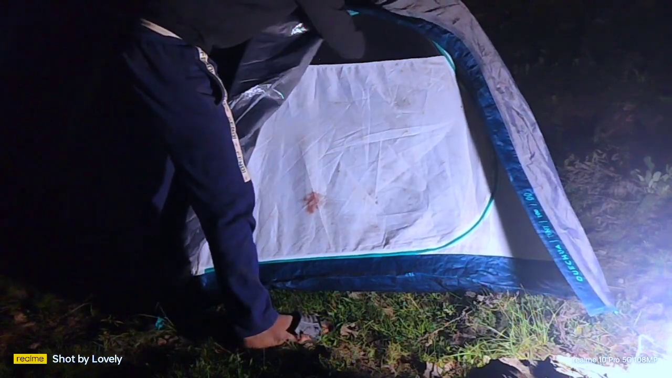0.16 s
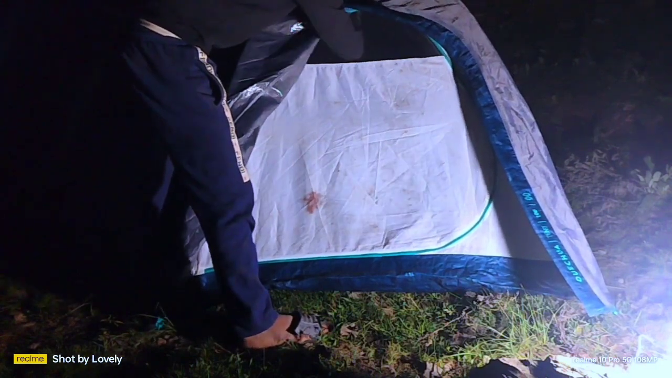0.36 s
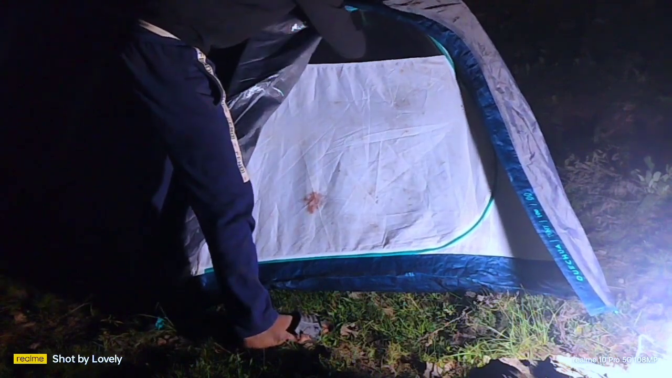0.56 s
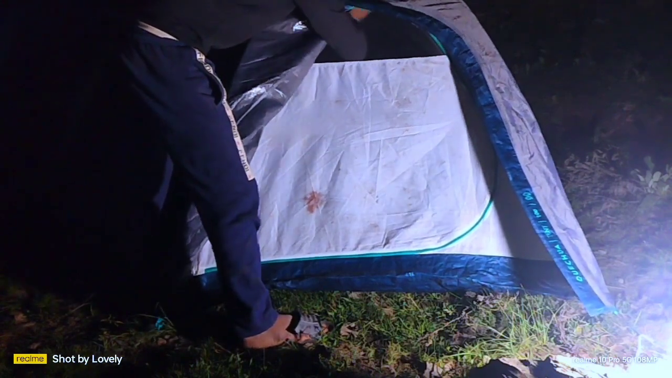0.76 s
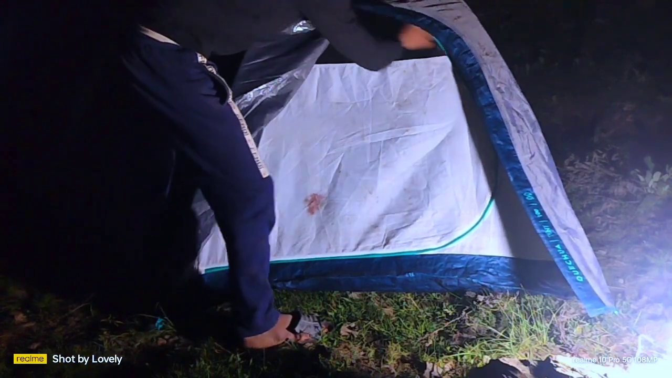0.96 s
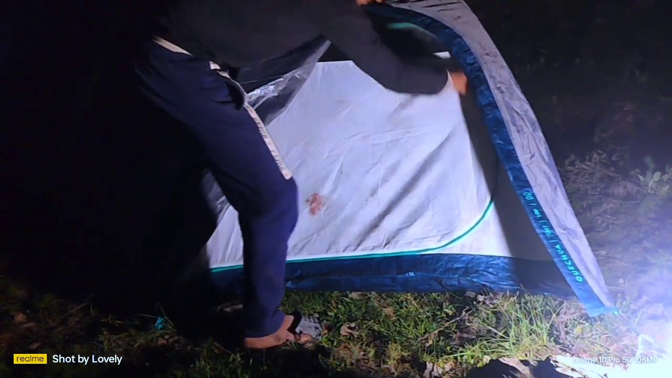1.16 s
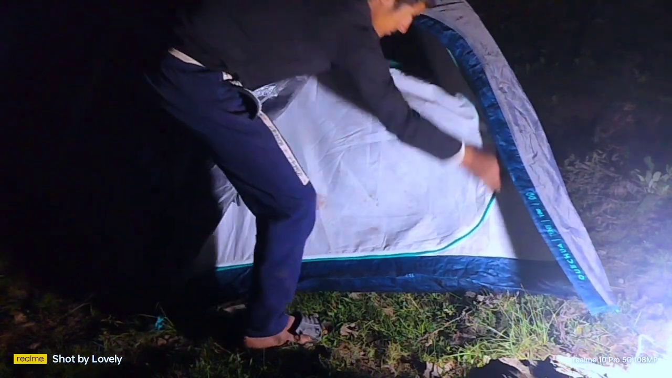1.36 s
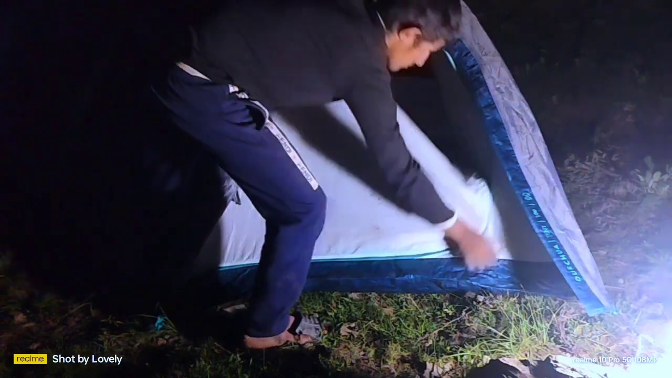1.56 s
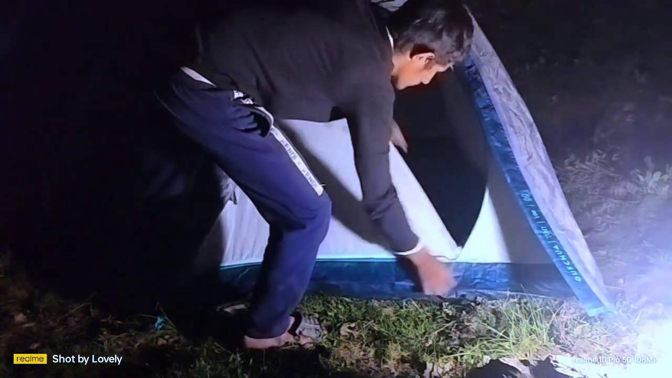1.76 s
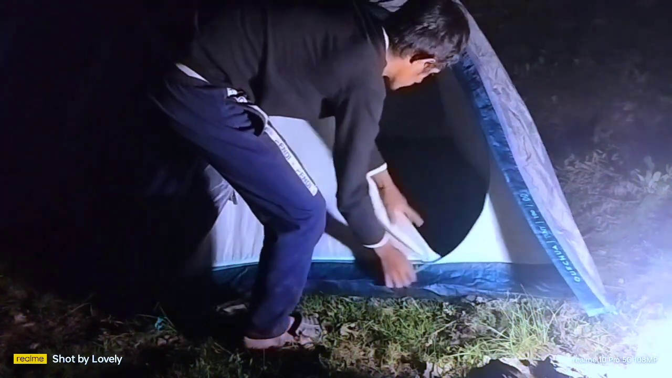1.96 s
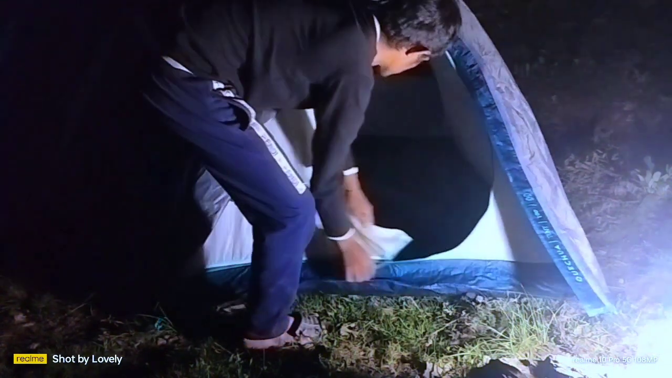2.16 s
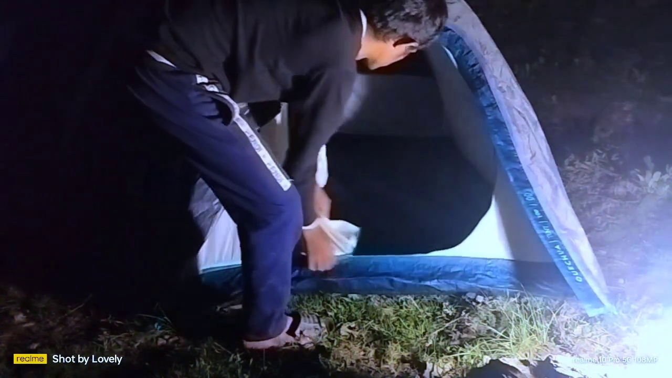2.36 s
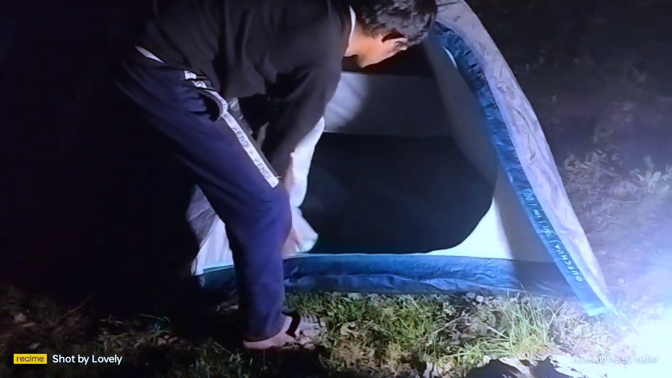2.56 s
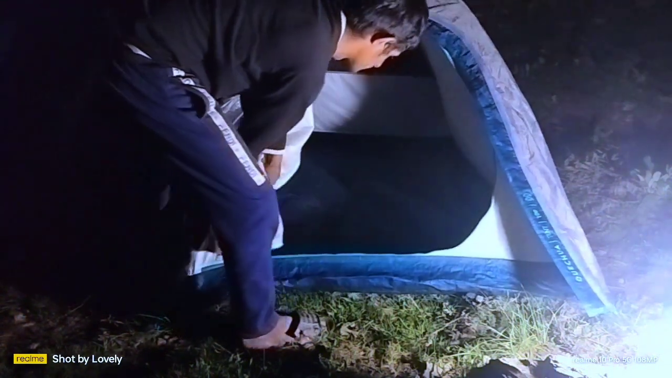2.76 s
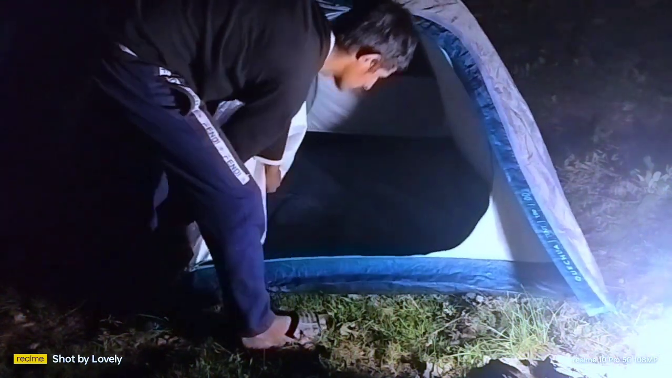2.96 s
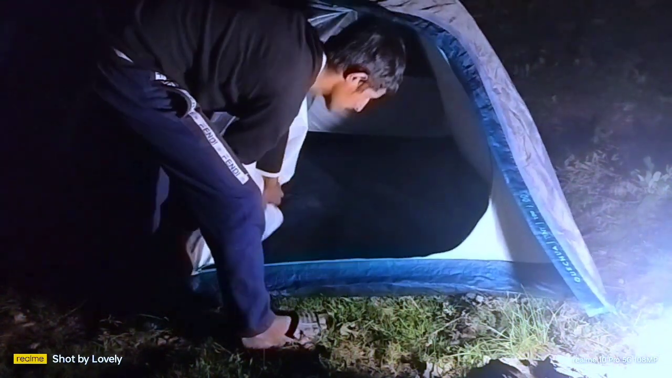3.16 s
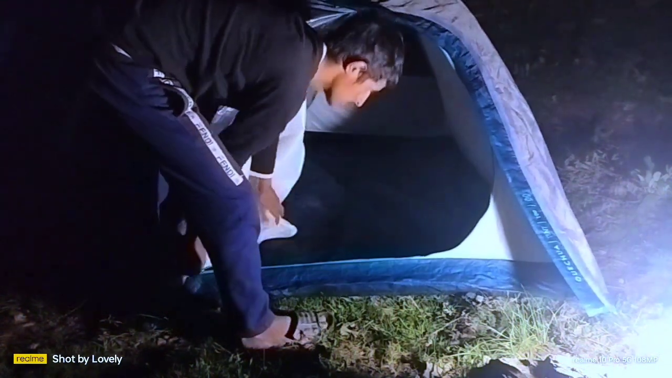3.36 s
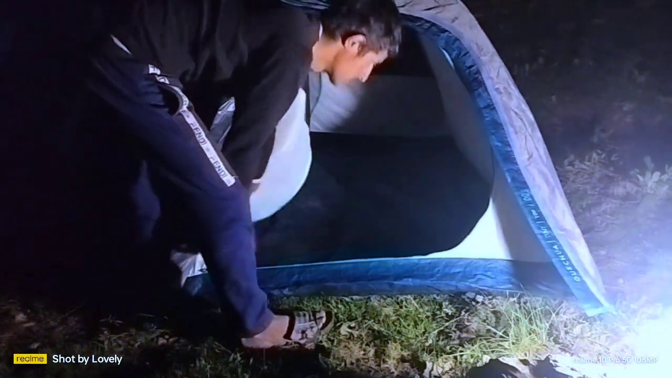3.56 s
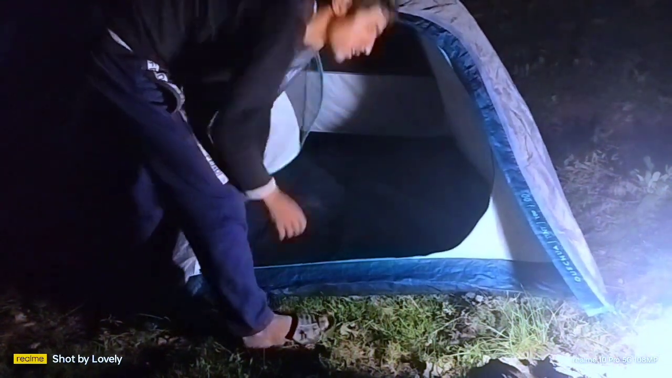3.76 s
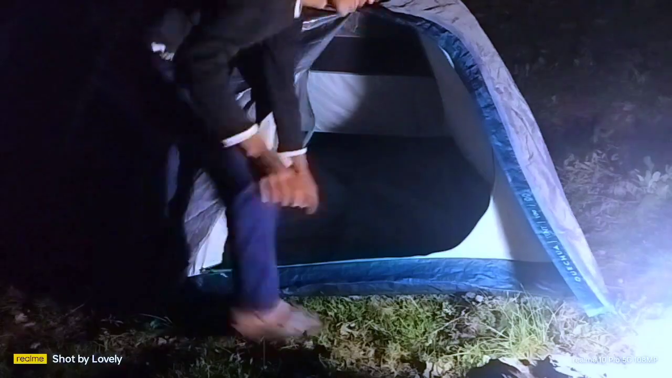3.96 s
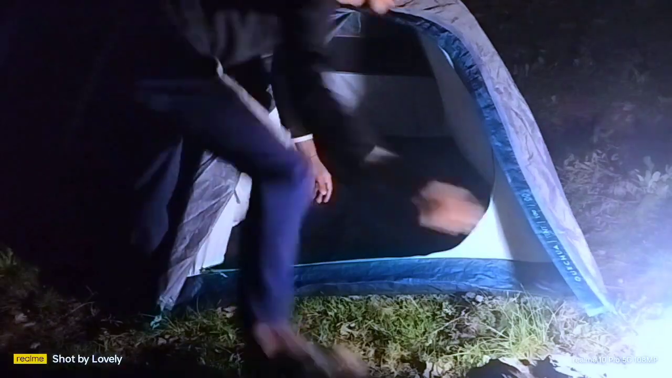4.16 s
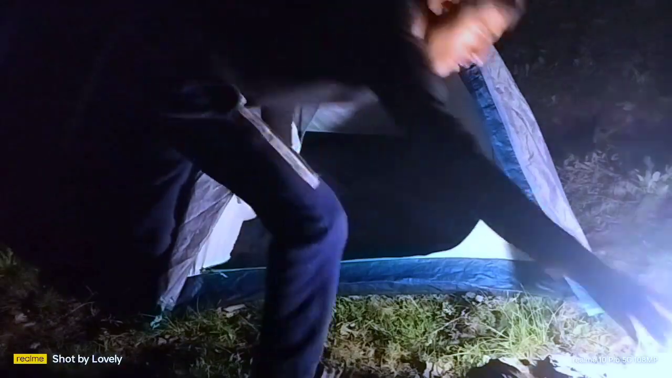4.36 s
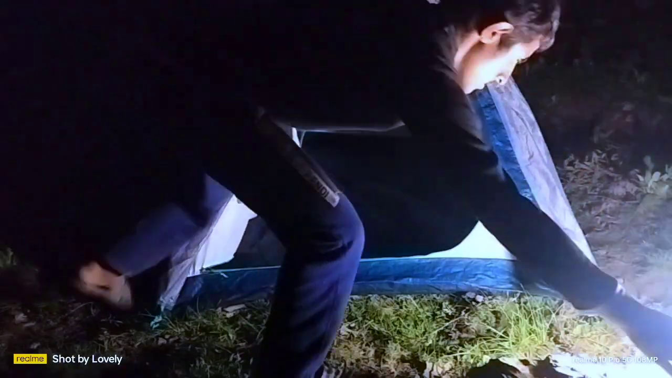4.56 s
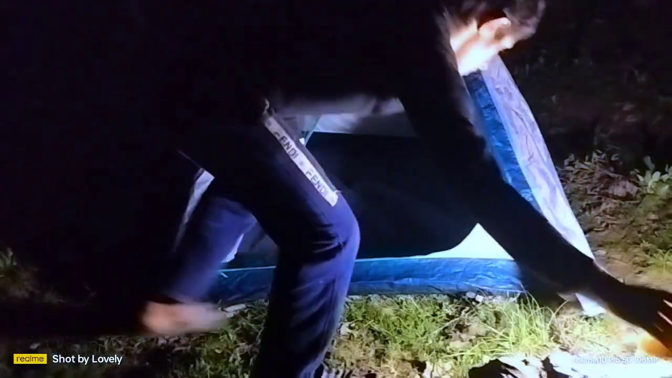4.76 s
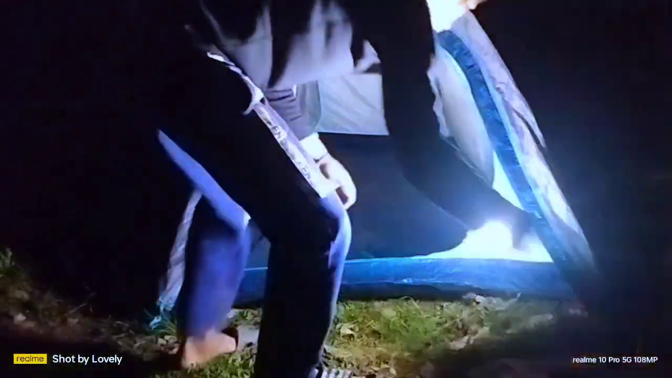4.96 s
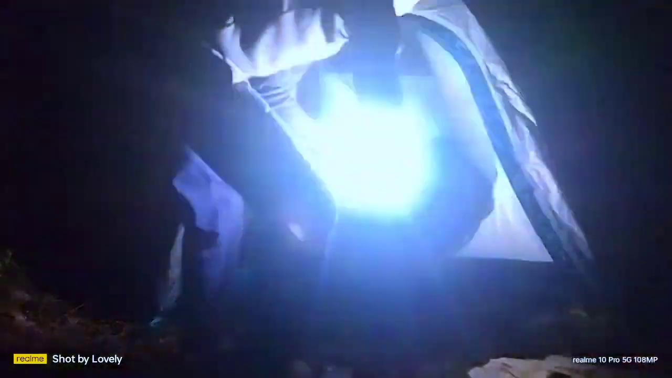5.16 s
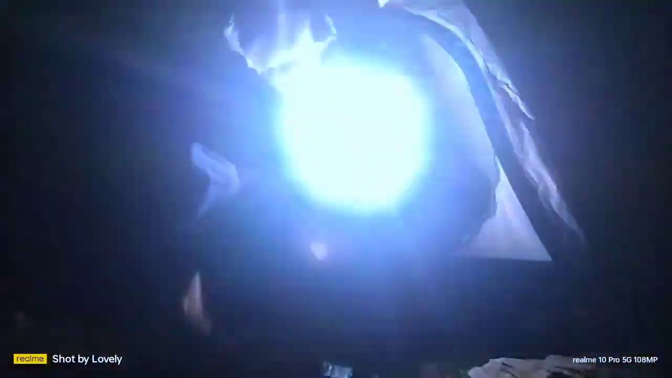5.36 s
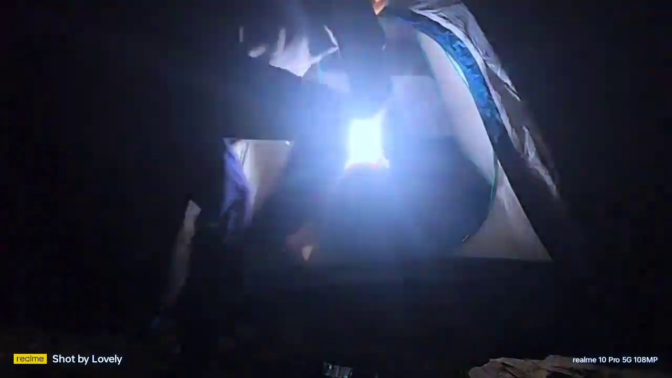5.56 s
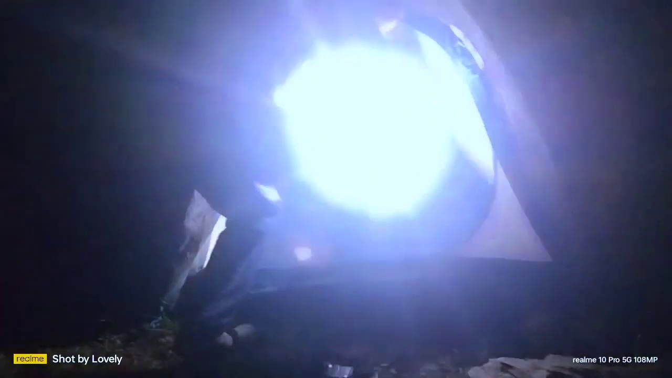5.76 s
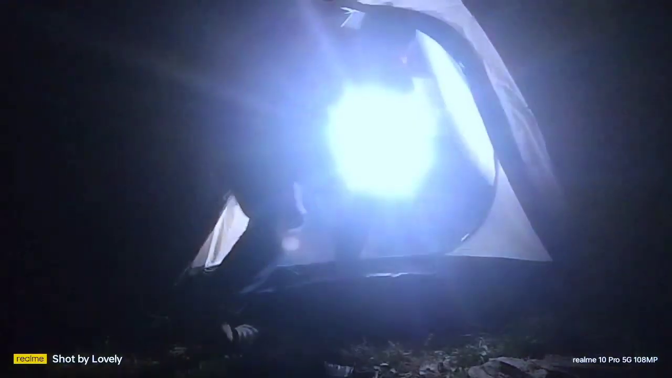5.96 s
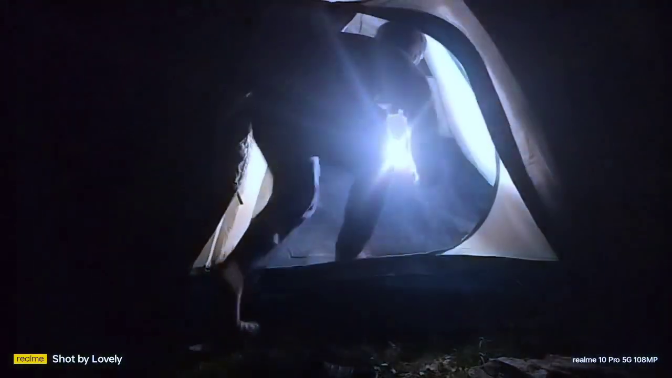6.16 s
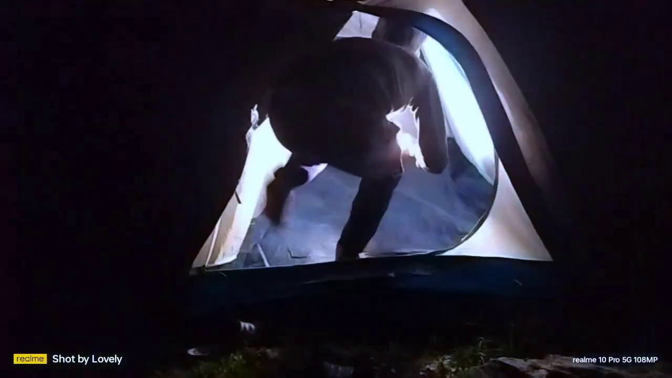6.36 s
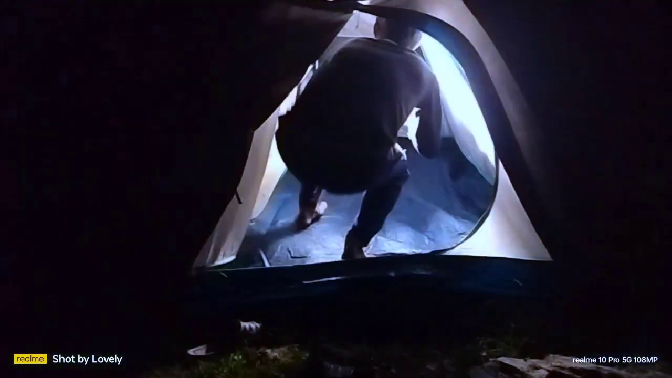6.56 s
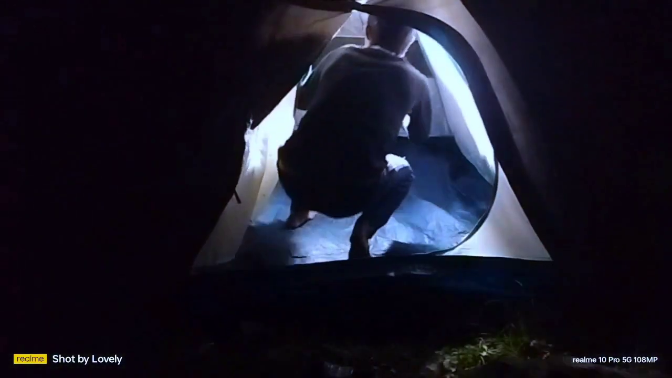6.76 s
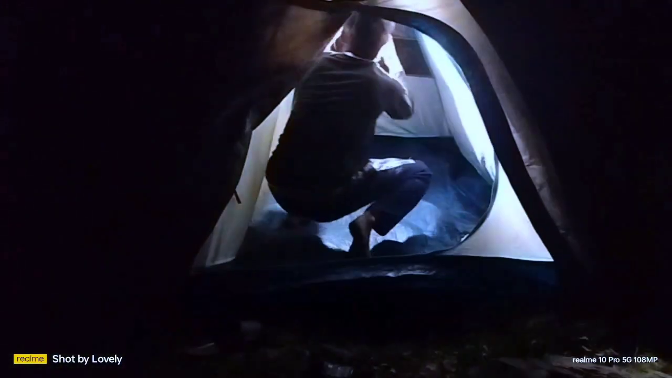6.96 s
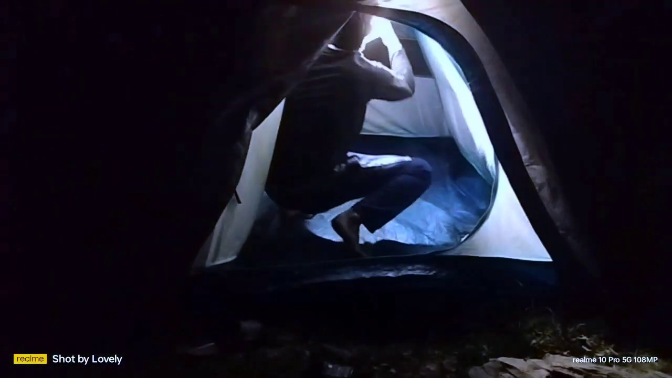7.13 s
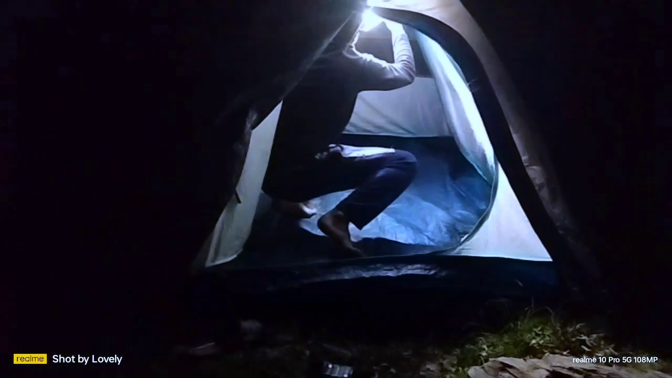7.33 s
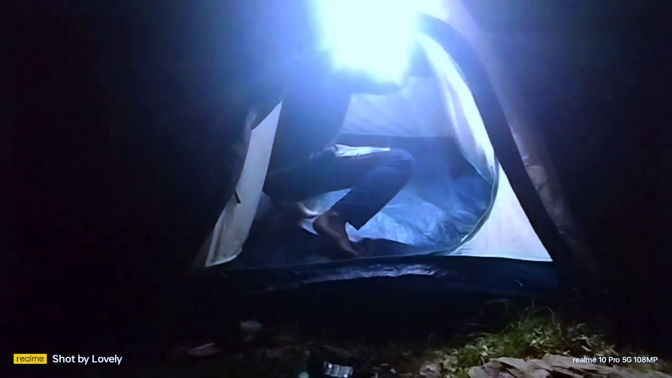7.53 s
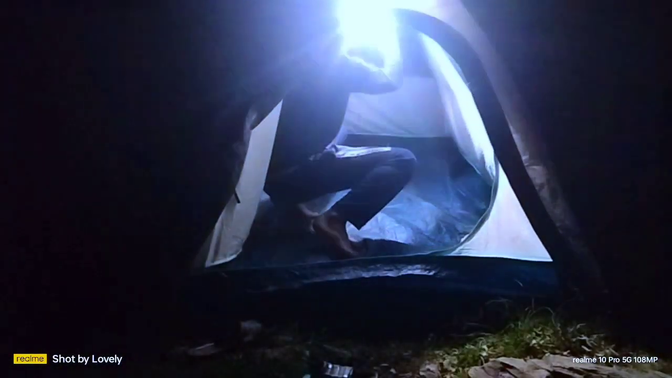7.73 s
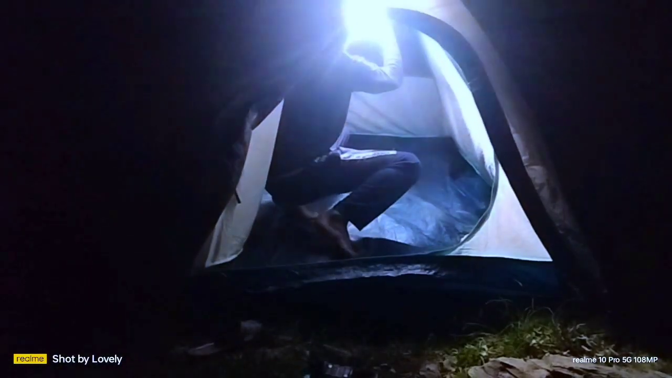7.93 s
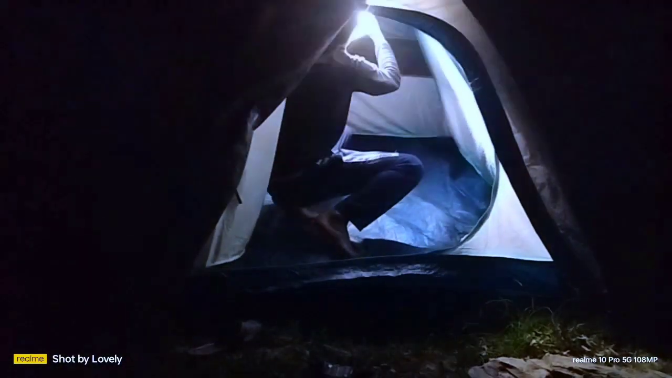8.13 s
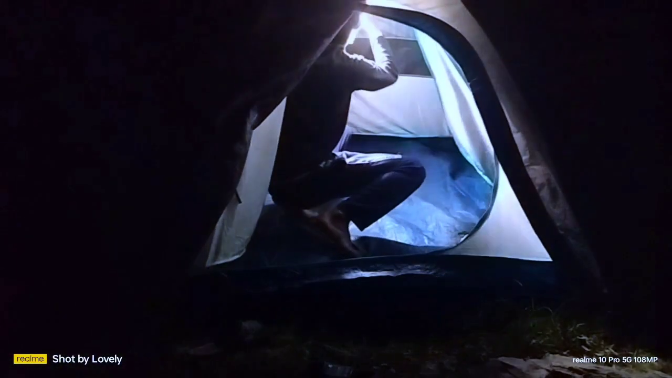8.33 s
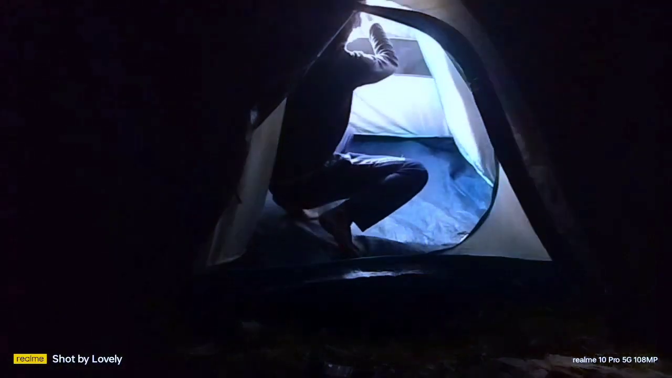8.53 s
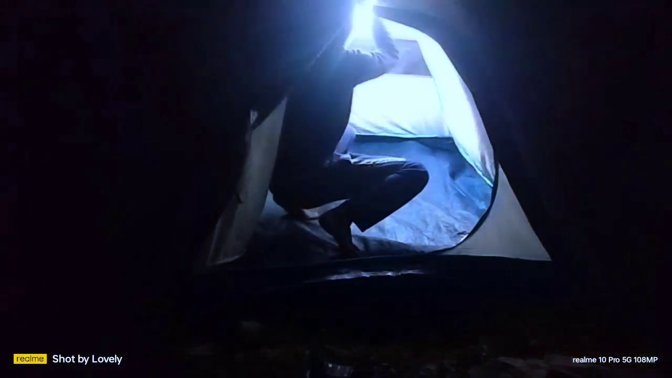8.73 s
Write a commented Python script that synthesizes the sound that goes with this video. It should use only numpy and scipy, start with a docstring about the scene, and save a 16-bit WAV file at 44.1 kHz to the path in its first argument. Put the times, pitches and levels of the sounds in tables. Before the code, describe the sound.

A zipper slider buzzes along a tent door, its pitch rising, sinking into rough, jerky clicks and rising unevenly before stopping. The nylon door is gathered with light rustles and a tiny squeak. A foot thumps and grass brushes; a pause, then loud crackly nylon, knocks and swishes as a person enters and crouches. Last come sparse faint creases. Dry, near, wide stereo microphones, very quiet night air.

```python
"""Tent door unzipped at night

One long curved pull: the slider whines at its tooth rate, a sine with three overtones. Nylon flaps, crumples
and swishes (noise bands under level curves) as the door is folded away and someone crawls in, with pops
(dying noise bursts in resonances), squeaks (narrow noise), thuds and grass brushes.
A faint night hiss lies under all; two spaced microphone ports listen."""
import sys
import numpy as np
from scipy import signal
from scipy.fft import rfft, irfft
from scipy.io import wavfile
from scipy.ndimage import uniform_filter1d, map_coordinates

SR = 44100
rng = np.random.default_rng(int(sys.argv[2]) if len(sys.argv) > 2 else 0)


def pcm_store(signal):
    """Save signal as 16-bit PCM."""
    levels = np.round(np.clip(np.atleast_2d(signal), -1, 1) * 32767)
    wavfile.write(sys.argv[1], SR, levels.astype(np.int16).T)


N = 387624
STEP = 16   # samples per control value


def from_db(db):
    """Amplitude gain of a level in dB."""
    return 10 ** (np.asarray(db) / 20)


def rms_one(x):
    """Scaled to rms 1."""
    return x / np.sqrt(np.mean(x ** 2) + 1e-20)


def in_time(rows):
    """Columns of a timed table, interpolated to one value a sample."""
    s, *columns = np.transpose(rows)
    t = np.arange(N) / SR
    return np.array([np.interp(t, s, column) for column in columns])


def at_hz(points, hz):
    """Spectrum read on a log-frequency axis."""
    points_hz, values = np.array(points).T
    return np.interp(np.log(hz), np.log(points_hz), values)


def drift(rate_hz):
    """Slow random curve of rms 1: noise twice through a one-pole low-pass, held for STEP samples."""
    settle = 2000
    pole = np.exp(-2 * np.pi * rate_hz * STEP / SR)
    noise = rng.standard_normal(N // STEP + 2 + settle)
    slow = signal.lfilter([1], [1, -2 * pole, pole * pole], noise)[settle:]
    return np.repeat(rms_one(slow), STEP)[:N]


def resonance(x, hz, width_hz):
    """Two-pole peak of gain 1."""
    r = np.exp(-np.pi * width_hz / SR)
    numerator = np.array([1, 0, -1]) * (1 - r * r) / 2
    return signal.lfilter(numerator, [1, -2 * r * np.cos(2 * np.pi * hz / SR), r * r], x)


def bands(bass, treble, likeness):
    """Narrow stereo noise bands of power about 1 per Hz, yielded as (centre Hz, sound)."""
    edges_hz = 22 * 2 ** np.arange(0, 9.7, .4)
    for k, (low, high) in enumerate(zip(edges_hz, edges_hz[1:])):
        source = bass if low < 3000 else treble
        band = signal.butter(2, [low, high], "band", fs=SR, output="sos")
        mid, side = signal.sosfilt(band, source[k % 2])   # alternate sources: neighbours unrelated
        hz = np.sqrt(low * high)
        alike = np.clip(at_hz(likeness, hz), -.99, .99)
        stereo = np.sqrt(1 + alike) * mid + np.sqrt(1 - alike) * side * [[1], [-1]]
        yield hz, np.sqrt(SR / 4.4) * stereo


# hiss spectrum: f/Hz, relative level/dB per Hz
NIGHT_SPECTRUM = [(12, -32), (20, -2), (22, -5.5), (77, -1), (222, -4.5), (277, -2), (319, -6.5),
                  (422, -19), (499, -11), (1150, -18), (1480, -18), (2910, -29), (16000, -39.5)]
# hiss stereo: f/Hz, left-right likeness/1
NIGHT_LIKENESS = [(60, 0.14), (380, 0.25), (2380, 0.043), (15000, 0.01)]
NIGHT_RMS_DB = -65


def night():
    """Far, smooth hiss; each band drifts slowly in level."""
    white = rng.standard_normal((2, 2, N))
    out = 0
    for hz, sound in bands(white, white, NIGHT_LIKENESS):
        out = out + from_db(at_hz(NIGHT_SPECTRUM, hz) + 0.39 * drift(3.0)) * sound
    return from_db(NIGHT_RMS_DB) * rms_one(out)


RUSTLE_RANGE_DB = 33.5   # climbed in the rise, lost in the fall
RUSTLE_ROUND = 1.144   # above 1: rounded top


def swell(t, peak_s, rise_s, fall_s):
    """Level in dB re peak of a rounded rise and fall."""
    distance = np.maximum((peak_s - t) / rise_s, (t - peak_s) / fall_s)
    return -RUSTLE_RANGE_DB * distance ** RUSTLE_ROUND


# opening door: t/s, swish level/dB, crumple re swish/dB, flap re what the speed gives/dB
DOOR = [(0.72, -80, 10, -2), (0.75, -65.5, -6, -14), (0.85, -67.5, 11.5, 8.5), (1.0, -45, -8, -3),
        (1.31, -44.5, 1, 5), (1.47, -39.5, -2, 2), (1.75, -40.5, 6.5, 1.1), (1.8, -38.5, 4.5, 1.6),
        (1.82, -28.5, 7, -2.2), (1.83, -36.5, 11, -0.8), (1.95, -41, 3.5, 0.1), (2.0, -36, 13, 2.8),
        (2.01, -42.5, 8, -1.6), (2.11, -38.5, -1, 2.8), (2.14, -33, 3, 2), (2.16, -49.5, 11, 2.5),
        (2.17, -36, 7, 1.3), (2.23, -40.5, 11.5, 8.8), (2.45, -43.5, 13, -0.5), (2.69, -36.5, 2.5, -5.6),
        (2.87, -49.5, 17, 1.1), (3.01, -44.5, 8, 10), (3.15, -83, 11.5, 0.1), (3.18, -69, 7, 13)]
# cloth, grass and clothes: peak t/s, rise/s, fall/s, flap level/dB, crumple level/dB, swish level/dB
RUSTLES = [(.15, 0.41, 0.6, -67.5, -69.5, -73.5), (3.088, 0.15, 0.058, -42.5, -53.5, -72),
           (3.208, 0.13, 0.18, -59, -60.5, -67), (3.298, 0.12, 0.67, -57.5, -67.5, -72.5),
           (3.612, 0.11, 0.42, -50.5, -68, -69.5), (3.801, 0.26, 0.13, -53.5, -61, -70.5),
           (3.914, 0.16, 0.28, -60, -62, -72.5), (4.178, 0.015, 0.075, -88, -80, -66),
           (4.291, 0.038, 0.041, -36, -47, -39.5), (4.371, 0.15, 0.17, -65, -63, -65.5),
           (4.486, 0.098, 0.07, -63, -62, -67.5), (4.97, 0.066, .15, -65.5, -74.5, -69),
           (5.041, 0.16, 0.043, -67, -66, -71), (5.234, 0.084, 0.089, -64, -62, -50),
           (5.285, 0.11, 0.035, -57.5, -75, -58), (5.72, 0.14, 0.38, -68.5, -83.5, -90.5),
           (5.936, 0.031, 0.11, -38, -39.5, -57), (5.978, 0.066, 0.075, -24.5, -27, -45),
           (6.06, 0.078, 0.16, -34, -38.5, -59), (6.11, .1, 0.16, -37, -35, -52),
           (6.164, 0.24, 0.029, -44, -36, -61), (6.238, 0.047, 0.13, -56, -50, -53),
           (6.28, 0.094, 0.047, -62, -67, -56), (6.36, 0.079, 0.071, -51.5, -47.5, -72),
           (6.52, 0.046, 0.24, -45.5, -45.5, -64), (6.61, 0.15, 0.096, -47.5, -49, -63.5),
           (6.728, 0.041, 0.12, -60, -45, -48), (6.78, 0.078, 0.12, -51, -55, -43),
           (6.835, 0.1, 0.12, -44, -29.5, -46), (6.9, .1, 0.25, -60, -64, -77),
           (7.07, .04, 0.18, -67, -57, -64.5), (7.171, 0.11, 0.31, -50, -48, -57.5),
           (7.3, 0.11, 0.31, -60, -54.5, -66), (7.392, 0.11, 0.055, -61, -50.5, -63),
           (8.04, 0.071, 0.097, -64, -67, -78), (8.33, .08, 0.072, -61, -73.5, -81)]
# dry grass: peak t/s, rise/s, fall/s, level/dB
BRUSHES = [(.15, .2, .2, -76), (4.99, 0.13, 0.13, -65), (5.24, 0.041, 0.092, -44.5),
           (6.79, 0.14, 0.15, -42)]
# feet and knees: t/s, billow level/dB
THUDS = [(4.29, -28), (5.27, -51), (5.972, -29), (6.518, -42), (6.835, -51), (7.392, -49)]
THUD_S = 0.028   # for RUSTLE_RANGE_DB, either side
BILLOW_RE_FLAP_DB = -14.5
DOOR_FLAP_DB = 7.5   # re swish at 400 teeth per s
FLAP_DB_PER_OCTAVE = -16.5   # slow slider shakes the cloth, fast one only rasps


def motion():
    """Power of billow, flap, crumple, swish and brush, every STEP samples: door, rustles, brushes, thuds."""
    t = np.arange(0, N, STEP) / SR
    teeth_hz = in_time(np.vstack(PULL))[0, ::STEP]
    swish_db, crumple_db, flap_db = in_time(DOOR)[:, ::STEP]
    flap_db = DOOR_FLAP_DB + flap_db + FLAP_DB_PER_OCTAVE * np.log2(teeth_hz / 400)
    door_db = swish_db + [flap_db, crumple_db, 0 * t]
    power = from_db(door_db) ** 2 * (t > DOOR[0][0]) * (t < DOOR[-1][0])
    for s, rise_s, fall_s, *peak_db in RUSTLES:
        power += from_db(np.array(peak_db)[:, None] + swell(t, s, rise_s, fall_s)) ** 2
    brushes = sum(from_db(db + swell(t, s, rise_s, fall_s)) ** 2 for s, rise_s, fall_s, db in BRUSHES)
    thuds = sum(from_db(db - RUSTLE_RANGE_DB * np.abs(t - s) / THUD_S) ** 2 for s, db in THUDS)
    billow = power[0] * from_db(BILLOW_RE_FLAP_DB) ** 2 + thuds
    return np.vstack([billow, power, brushes])


def per_hz(spectrum, band_hz):
    """Spectrum shifted to power 1 inside its reference band."""
    hz = np.arange(*band_hz)
    power = np.sum(from_db(at_hz(spectrum, hz)) ** 2)
    return np.array(spectrum) - [0, 10 * np.log10(power)]


def clumps(per_s, fade_s, steady):
    """Loudness of buckling fibres: sudden starts, quick fades, over a steady share."""
    buckles = (rng.random(N) < per_s / SR) * rng.exponential(1, N)
    return rms_one(steady + signal.lfilter([1], [1, -np.exp(-1 / (fade_s * SR))], buckles))


# spectra of the five motions: f/Hz, relative level/dB per Hz
BILLOW = [(20, -25.5), (40, -10.5), (80, -5), (130, 1), (200, -10.5), (300, -31)]
FLAP = [(70, -23.5), (130, -4.5), (200, 2), (400, 1.5), (650, -7.5), (1000, -10), (1600, -44.5)]
CRUMPLE = [(250, -25), (500, -2), (1000, -1.5), (1500, -0.5), (2200, -3.5), (3500, -18.5), (5500, -33),
           (9000, -54)]
SWISH = [(1500, -13.5), (3000, 1), (5500, -6), (7000, -12), (8700, -4.5), (11000, -6.5), (16500, -13.5)]
BRUSH = [(4000, -30), (7000, -6), (9500, 0), (13000, 3), (16500, -8)]
# reference bands of the motion levels
BILLOW_HZ, FLAP_HZ, CRUMPLE_HZ = (40, 140), (150, 330), (1100, 3200)
SWISH_HZ, BRUSH_HZ = (6000, 15000), (6000, 15000)
# cloth stereo: f/Hz, left-right likeness/1
CLOTH_LIKENESS = [(30, 0.94), (60, 1), (130, 0.86), (300, 0.91), (600, 0.593), (1200, 0.47), (2500, .6),
                  (5000, 0.48), (12000, 0.058)]
# taut wall resonances: f/Hz, width/Hz, gain/dB before the common halving
PANEL = [(339.2, 23, -6.5), (582, 20, 6.5), (983.5, 17, 14), (1420, 160, 5.5), (2030, 48, 8.5)]


def cloth():
    """Buckles in the weave drive motions from slow billows to fine rasp; the taut wall rings along."""
    spectra = (BILLOW, FLAP, CRUMPLE, SWISH, BRUSH)
    shapes = map(per_hz, spectra, (BILLOW_HZ, FLAP_HZ, CRUMPLE_HZ, SWISH_HZ, BRUSH_HZ))
    layers = list(zip(motion(), shapes))
    white = rng.standard_normal((2, 2, N))
    bass = white * clumps(per_s=300, fade_s=0.0031, steady=1.0)
    treble = white * clumps(per_s=400, fade_s=.0015, steady=3.5)
    out = 0
    for hz, sound in bands(bass, treble, CLOTH_LIKENESS):
        power = 0
        for level, shape in layers:
            inside = shape[0, 0] < hz < shape[-1, 0]
            power = power + level * from_db(at_hz(shape, hz)) ** 2 * inside
        gain = np.repeat(np.sqrt(power), STEP)[:N]
        out = out + gain * from_db(1.8 * drift(15.0)) * sound
    # deep rumble below 75 Hz is filtered out
    out = signal.sosfilt(signal.butter(3, 75, "high", fs=SR, output="sos"), out)
    ringing = sum(from_db(db) * resonance(out, hz, width_hz) for hz, width_hz, db in PANEL)
    return 0.69 * (out + ringing / 2)


# slider, three parts: over the top, round the corner, along the foot
# t/s, tooth rate/Hz, fundamental level/dB rms, 2nd harmonic/dB rms, 3rd harmonic/dB rms
PULL = [
    [(0.78, 380.9, -68, -63, -79), (0.848, 401, -54.5, -48, -66), (0.89, 494, -60, -52.5, -71),
     (0.97, 847.6, -28, -49, -53), (1.018, 999.5, -39, -43, -46), (1.08, 991, -22, -32.5, -55),
     (1.098, 1018, -35.5, -47, -66), (1.112, 949, -37.5, -39, -58), (1.166, 938.0, -35.5, -42, -53),
     (1.2, 791, -21, -34, -56), (1.208, 814, -34, -43, -65.5), (1.226, 867, -21.5, -39, -42),
     (1.242, 760, -30, -34.5, -58), (1.284, 778.2, -23, -34, -40), (1.306, 838, -29, -32, -61),
     (1.336, 875, -15.5, -32.5, -42), (1.36, 971.6, -19, -44, -46), (1.392, 968, -24.5, -33.5, -62),
     (1.414, 988.6, -20.5, -38, -46), (1.44, 979, -30.5, -35, -72), (1.464, 928.6, -30.5, -42, -62.5),
     (1.484, 848, -27, -27.5, -56), (1.52, 844.2, -28, -36.5, -36), (1.54, 723, -46, -37, -48),
     (1.584, 702, -28, -29, -36), (1.6, 640, -51, -30, -47)],
    [(1.6, 604.7, -19.5, -39, -44), (1.63, 440, -23, -50, -51.5), (1.652, 451.5, -25, -38, -32),
     (1.702, 408, -29, -45, -59), (1.722, 375.6, -28, -55.5, -39), (1.746, 308.6, -18.5, -26, -31),
     (1.772, 288.8, -28.5, -41, -45), (1.812, 307.7, -22, -30, -23.5), (1.85, 280.9, -27, -31.5, -37.5),
     (1.888, 302.1, -21.5, -18, -24.5), (1.924, 281.2, -34.5, -39.5, -44.5),
     (1.986, 300.6, -26.5, -32.5, -32.5), (2.0, 286.1, -29, -38, -49), (2.08, 296.3, -34, -37, -33.5),
     (2.1, 342.3, -31, -40, -48), (2.14, 485.8, -18, -33, -45), (2.186, 461.4, -33, -40, -46.5),
     (2.2, 416.5, -20.5, -37, -54.5), (2.258, 438, -18, -39.5, -38.5), (2.276, 405.2, -24, -38, -41),
     (2.324, 392.6, -20, -36, -50.5), (2.372, 360.3, -23.5, -32, -52), (2.386, 315.5, -28, -39, -39),
     (2.404, 303.3, -39, -33, -33), (2.456, 321.2, -18.5, -39, -50), (2.5, 357, -36.5, -40, -57)],
    [(2.5, 365.3, -18, -30, -68), (2.504, 362, -30, -40, -50), (2.542, 419.9, -25.5, -40, -47),
     (2.58, 448.2, -21, -31.5, -56), (2.604, 449.6, -22.5, -35.5, -41), (2.64, 511.5, -20.5, -42, -54),
     (2.662, 542, -21.5, -48, -41.5), (2.678, 612.1, -18, -41.5, -30.5), (2.722, 613.0, -16.5, -27, -37),
     (2.734, 594, -14, -41, -49.5), (2.748, 562, -30.5, -40, -37.5), (2.768, 528, -27.5, -49, -58.5),
     (2.788, 554.7, -19.5, -38, -36.5), (2.802, 511, -20.5, -43, -50), (2.83, 490.8, -19.5, -34, -43.5),
     (2.836, 486, -40, -42.5, -36), (2.85, 510.8, -18, -38.5, -55), (2.864, 479.3, -25, -44, -57),
     (2.886, 481.2, -27, -59, -50), (2.908, 532.3, -11.5, -55, -46), (2.924, 466.4, -27, -40, -50),
     (2.954, 409, -26, -32, -56), (2.96, 398.8, -45, -41, -57), (3.0, 522.7, -17.5, -37.5, -51),
     (3.02, 505, -25, -39, -47), (3.06, 411, -52.5, -58, -65.5)],
]
FOURTH_RE_THIRD_DB = -3.5
JERK = .22   # unsteadiness of the hand, 0-1


def slider():
    """Teeth push the taut tape: a rounded wave at tooth rate; the hand's jerks shake speed and force."""
    teeth_hz, *harmonics_db = uniform_filter1d(in_time(np.vstack(PULL)), size=200)
    jerk = JERK * (800 / teeth_hz) ** .35   # slow slider sticks and slips more
    tremble = .1 * drift(45.0) + .36 * np.tanh(drift(130.0) / 2)
    shaken_hz = teeth_hz * np.exp(jerk * uniform_filter1d(tremble, size=16))
    phase = 2 * np.pi * np.cumsum(shaken_hz) / SR
    force_db = 10 * jerk * drift(70.0) + 0.5 * drift(250.0)   # no two teeth catch alike
    harmonics_db.append(harmonics_db[-1] + FOURTH_RE_THIRD_DB)
    out = 0
    for k, level_db in enumerate(harmonics_db):
        # upper harmonics take other paths through the cloth
        wander = 0.092 * k * uniform_filter1d(drift(42.0), size=16)
        flutter_db = 2.0 * drift(51.0) + 0.69 * k * drift(12.0)
        gain = uniform_filter1d(from_db(level_db + force_db + flutter_db), size=16)
        out = out + np.sqrt(2) * gain * np.sin((k + 1) * phase + wander)
    t = np.arange(N) / SR
    start_s, end_s = PULL[0][0][0], PULL[-1][-1][0]
    out = out * np.clip(np.minimum(t - start_s, end_s - t) / 0.0073, 0, 1)
    return np.array([out, out])


# creases snapping, cloth slaps, slider catches:
# t/s, snap peak/dB, snap f/Hz, flap level/dB, flap f/Hz, crack level/dB
POPS = [(1.709, -32, 969, -9.5, 356, -43), (1.729, -17, 1549, -27, 487, -43),
        (1.741, -31, 926, -9.5, 262.1, -40), (1.752, -38, 946.6, -18, 342, -31.5),
        (1.784, -14.5, 1000, -14, 374, -33), (1.824, -8.5, 1033, -19, 290.1, -19.5),
        (1.839, -9, 993, -35, 240, -24), (1.862, -12, 1030, -11, 570, -34),
        (1.881, -6, 1341, -11.5, 601, -27), (1.89, -7.5, 940, -23, 600, -25.5),
        (1.945, -9.5, 995, -27, 355, -30.5), (1.962, -13, 968, -28, 265.8, -41),
        (1.997, -16.5, 1023, -29, 305.4, -23), (2.057, -22, 930, -23, 374, -32),
        (2.168, -19, 846, -10.5, 492, -30), (2.313, -18, 912, -10, 364.9, -50),
        (2.876, -42, 1865, -13.5, 310, -60), (2.9, -33, 915, -17, 538, -44),
        (2.977, -36, 944, -13.5, 345.3, -45), (3.027, -25, 884, -18, 341.8, -43),
        (3.083, -48, 973, -37.5, 419.7, -63), (3.108, -56, 1034, -46, 593, -70),
        (3.205, -63, 1970, -43.5, 500, -62), (3.29, -76, 958, -41, 234, -77),
        (3.365, -54, 1380, -50, 662, -72), (3.447, -61.5, 954, -48.5, 490, -78),
        (3.577, -70, 800, -43, 343, -59), (3.612, -70.5, 830, -41.5, 470, -70),
        (3.679, -43, 1210, -38, 470, -68), (3.889, -41, 1170, -44, 583, -72),
        (3.905, -32, 1110, -36.5, 580, -62), (4.177, -51, 2370, -83.5, 200, -66),
        (4.276, -20, 865, -16, 432, -48), (4.287, -16, 1015, -35, 560, -41),
        (4.308, -35, 1000, -26, 640, -62), (4.325, -54, 834, -41.5, 261, -72),
        (4.383, -32, 2580, -56, 610, -53), (4.655, -46, 920, -47.5, 613, -64),
        (5.924, -34, 810, -34, 553, -70), (5.944, -26.5, 848, -23, 500, -46),
        (5.962, -30, 1220, -24, 400, -45), (5.974, -20, 910, -20.5, 450, -52),
        (6.05, -29, 1360, -23, 370, -58), (6.097, -26, 856, -23.5, 720, -58),
        (6.114, -22, 960, -20.5, 495, -50), (6.157, -23, 1390, -35.5, 324, -61),
        (6.237, -31, 2300, -57, 484, -39.5), (6.305, -40, 1470, -46.5, 674, -68),
        (6.35, -35, 1380, -49, 635, -69), (6.358, -26, 1490, -43, 487, -67),
        (6.494, -38.5, 1550, -40, 703, -71), (6.504, -28, 870, -35.5, 452, -65),
        (6.521, -21, 1270, -33.5, 486, -66), (6.555, -24.5, 875, -38, 272, -58),
        (6.685, -40, 1410, -46.5, 517, -56), (6.77, -38, 1680, -32.5, 520, -34),
        (6.829, -18, 1400, -25.5, 550, -33), (6.848, -21.5, 1080, -28.5, 580, -26),
        (7.068, -37.5, 2100, -65, 401, -70), (7.182, -23, 1330, -38, 270, -47),
        (7.196, -33, 1420, -37, 665, -60), (7.227, -38, 1420, -42, 510, -64),
        (7.237, -34.5, 1200, -58, 318, -59), (7.294, -30.5, 1590, -40.5, 730, -66),
        (7.32, -34, 880, -43.5, 240, -65), (7.373, -31, 926, -61, 565, -66),
        (7.396, -28, 1270, -57, 201, -58), (8.032, -33.5, 1256, -49, 433, -75),
        (8.051, -38, 1238, -65, 401, -76), (8.305, -44.5, 1270, -50, 512, -69),
        (8.314, -43, 1430, -58, 552, -70)]
FLAP_CREST_DB, CRACK_CREST_DB = 0.5, 3.5   # added to the listed levels
POP_T60_S, POP_SPREAD_DB = .053, 2   # decay of the burst, left-right scatter


def pops():
    """A dying burst shakes the cloth: low flap at its own pitch, snap above it, bright crack."""
    t = np.arange(3000) / SR
    out = np.zeros((2, N + len(t)))
    noise, chance = rng.standard_normal((len(POPS), 4, len(t))), rng.standard_normal(len(POPS))
    soft = signal.butter(2, 3000, fs=SR, output="sos")   # the pop's body falls away above this
    bright = signal.butter(2, 3500, "high", fs=SR, output="sos")
    dying = (1 - np.exp(-(t / 0.0015) ** 2)) * from_db(-60 * t / POP_T60_S)   # tension builds, lets go
    crack_decay = (t > .002) * np.exp((.002 - t) / 0.0015)
    for row, (shake, jolt, *hiss), side in zip(POPS, noise, chance):
        s, snap_db, snap_hz, flap_db, flap_hz, crack_db = row
        jolt = jolt + 3.93 * (np.abs(t - .0025) < .00006)   # the instant the crease gives way
        flap = resonance(resonance(shake * dying, flap_hz, .5 * flap_hz), flap_hz, .5 * flap_hz)
        snap = resonance(resonance(jolt * dying ** 0.91, snap_hz, .8 * snap_hz), snap_hz, .8 * snap_hz)
        body = from_db(flap_db + FLAP_CREST_DB) * flap / np.abs(flap).max()
        body = body + from_db(snap_db) * snap / np.abs(snap).max()
        body = signal.sosfilt(soft, body)
        crack = signal.sosfilt(bright, np.array(hiss) * crack_decay) * from_db(crack_db + CRACK_CREST_DB)
        pan_db = POP_SPREAD_DB * side
        i = round(s * SR)
        out[:, i:i + len(t)] += (body + crack) * from_db([[pan_db / 2], [-pan_db / 2]])
    return out[:, :N]


# fingers on coated cloth: t/s, length/s, f/Hz, width/Hz, rms level before the fades/dB
SQUEAKS = [(3.182, 0.041, 2050, 150, -62), (3.729, 0.15, 1550, 203, -57.5),
           (5.689, 0.063, 1212, 40.2, -67.5)]


def squeaks():
    """Friction noise caught in one narrow resonance."""
    out = np.zeros(N)
    for s, length_s, hz, width_hz, db in SQUEAKS:
        i, n = round(s * SR), round(length_s * SR)
        rub = resonance(resonance(rng.standard_normal(8000), hz, width_hz), hz, width_hz)[-n:]
        out[i:i + n] += from_db(db) * rms_one(rub) * np.hanning(n) ** .5
    return out


# source side: t/s, lag of left port/samples
LAG = [(0, 5), (1.0, 4.5), (2.2, 3), (2.6, -0.5), (3.2, -4.5), (4.0, -3), (8.79, 5)]


def scene():
    """The tent's sounds reach one port a little before the other; night hiss is added."""
    left, right = cloth() + slider() + pops() + squeaks()
    late = np.arange(N) - in_time(LAG)[0]
    return np.array([map_coordinates(left, [late], order=3), right]) + night()


# port colour: f/Hz, left re right/dB
PORTS = [(60, 2), (130, 1), (1000, 0.65), (3000, 0), (5000, 1), (6500, 10), (8000, -12), (10000, -10),
         (12000, -1), (15000, -1.5)]
CUTOFF_HZ = 15900


def record(dry):
    """The ports differ in colour; peaks are rounded, the top is cut."""
    hz = np.maximum(np.fft.rfftfreq(N, 1 / SR), 1)
    tilt = from_db(at_hz(PORTS, hz) / 2)
    wet = irfft(rfft(dry) * [tilt, 1 / tilt], N)
    top_cut = signal.cheby2(12, 70, CUTOFF_HZ + 350, fs=SR, output="sos")   # -70 dB from the edge given
    return signal.sosfilt(top_cut, 1.415 * np.tanh(wet / 1.26))


dry = scene()
out = record(dry)
pcm_store(out)
```